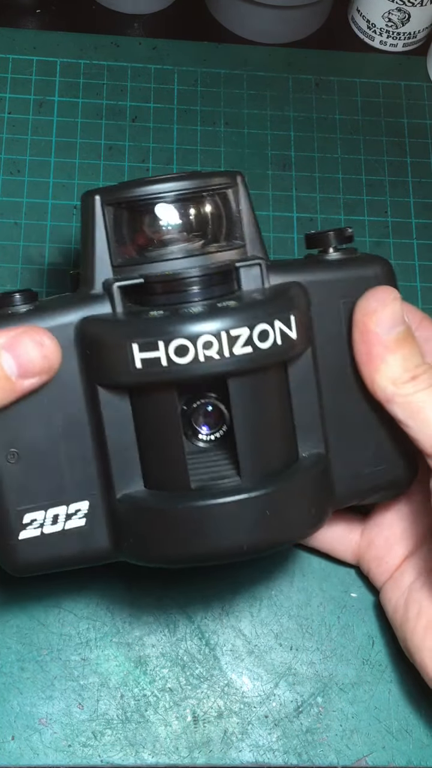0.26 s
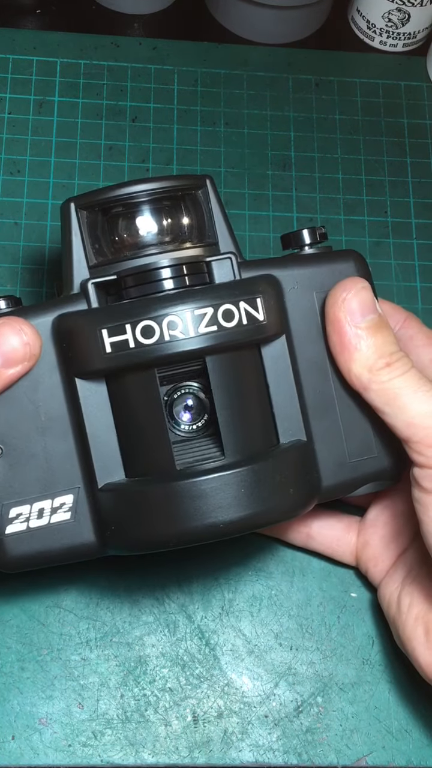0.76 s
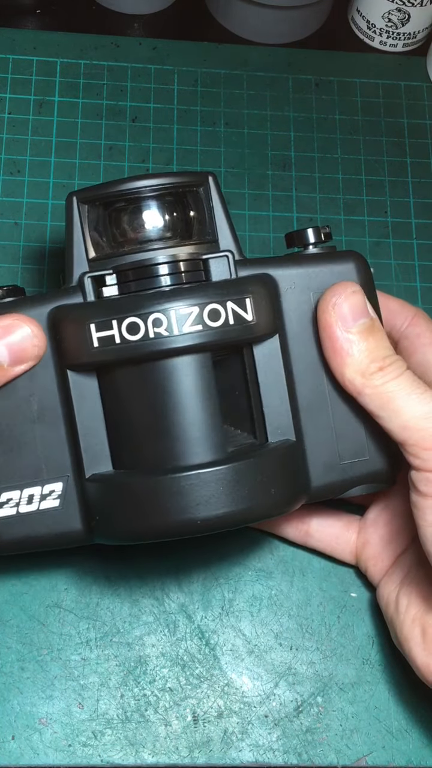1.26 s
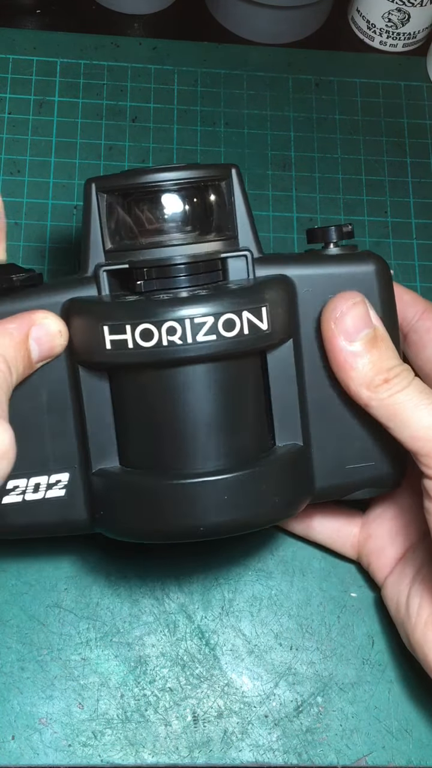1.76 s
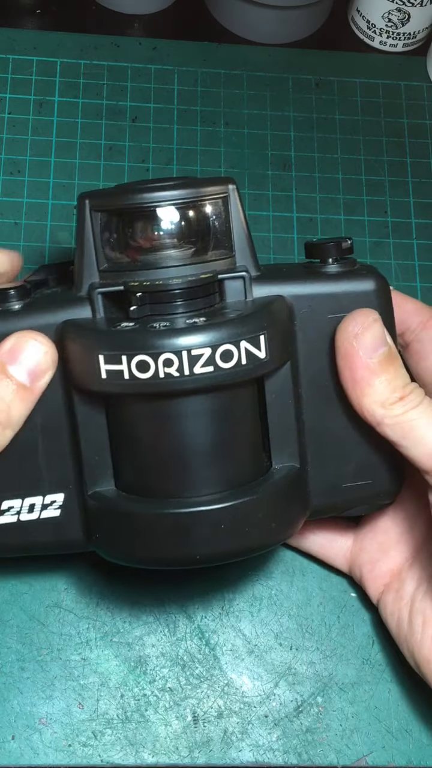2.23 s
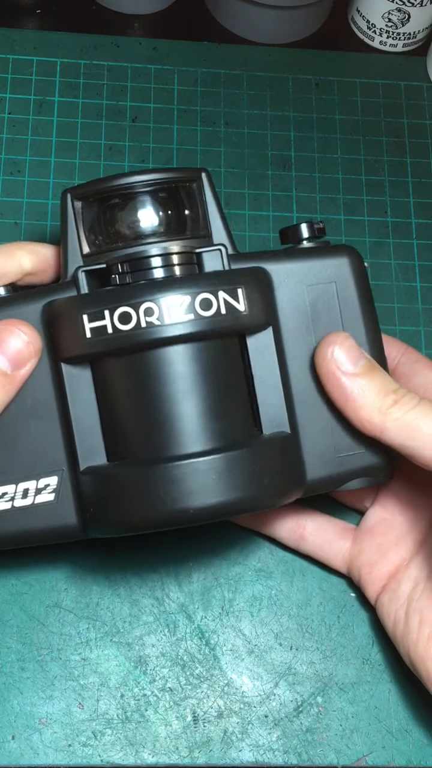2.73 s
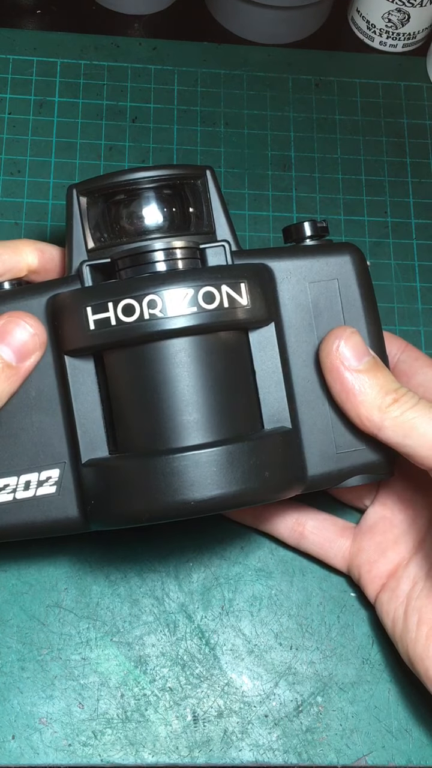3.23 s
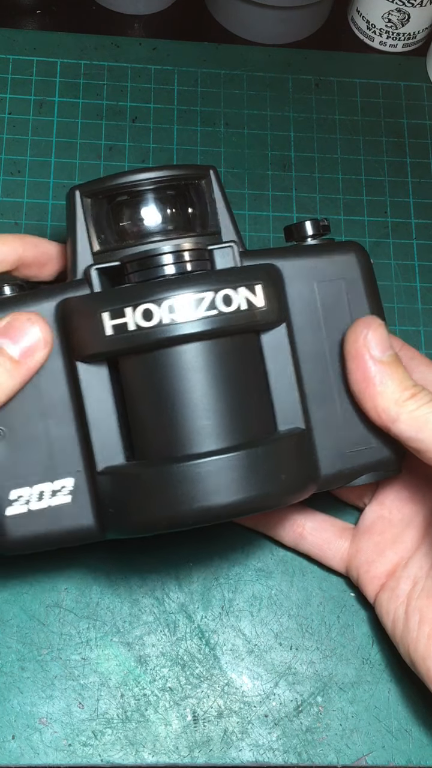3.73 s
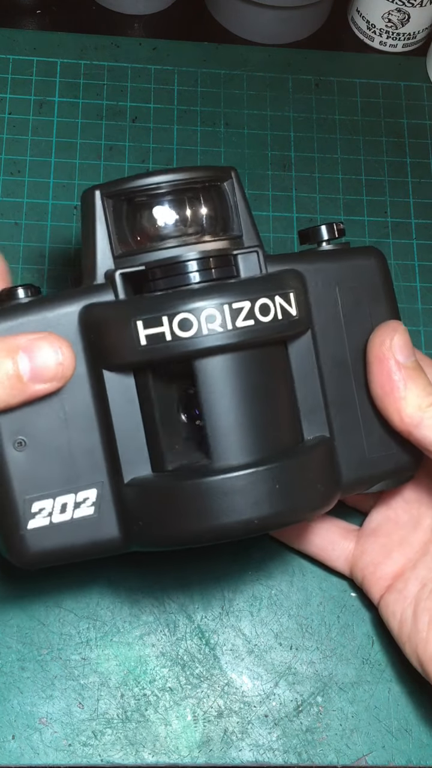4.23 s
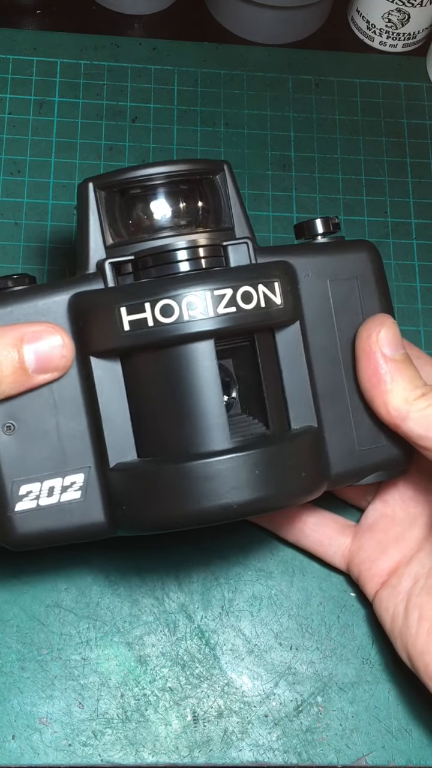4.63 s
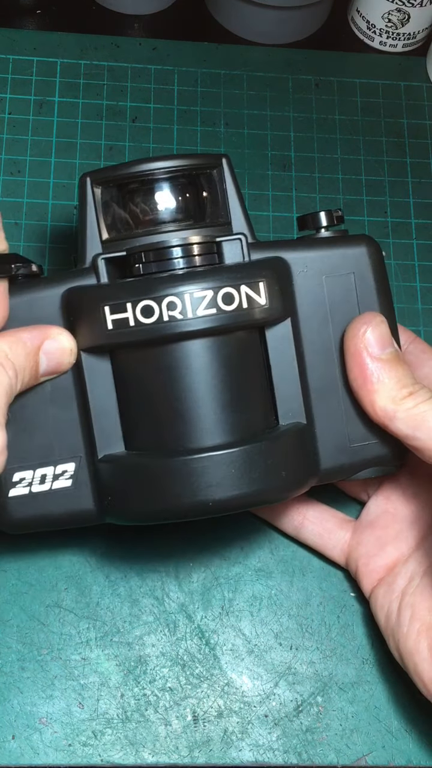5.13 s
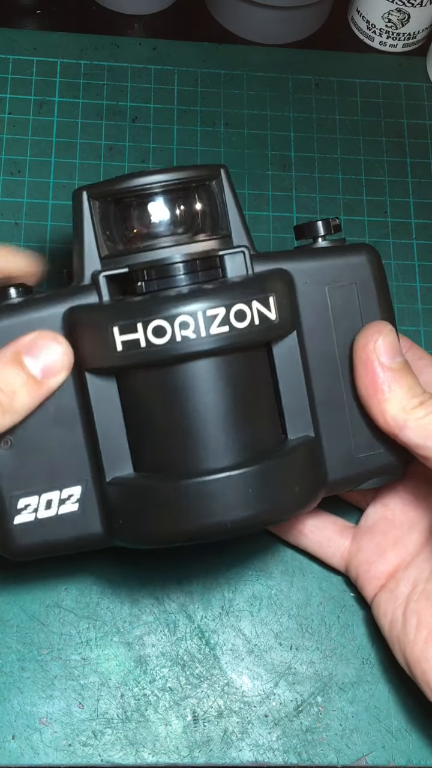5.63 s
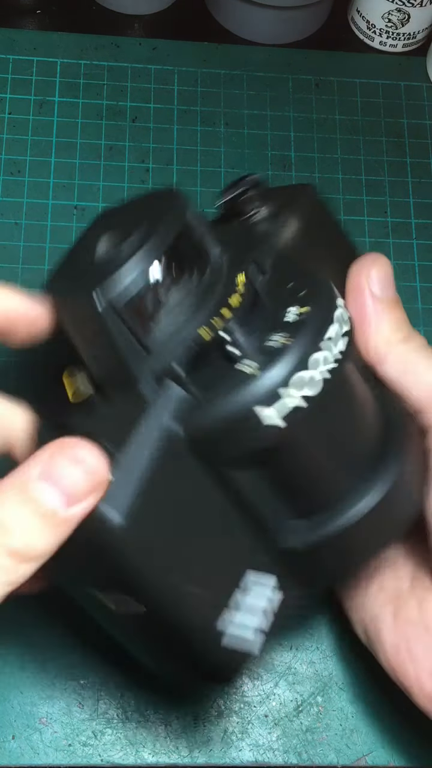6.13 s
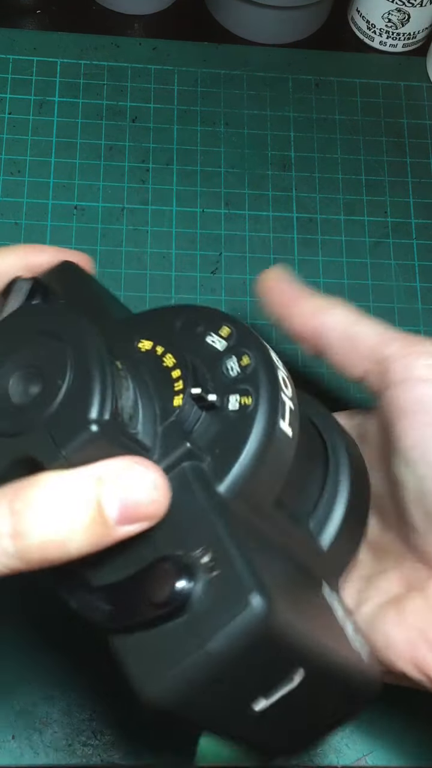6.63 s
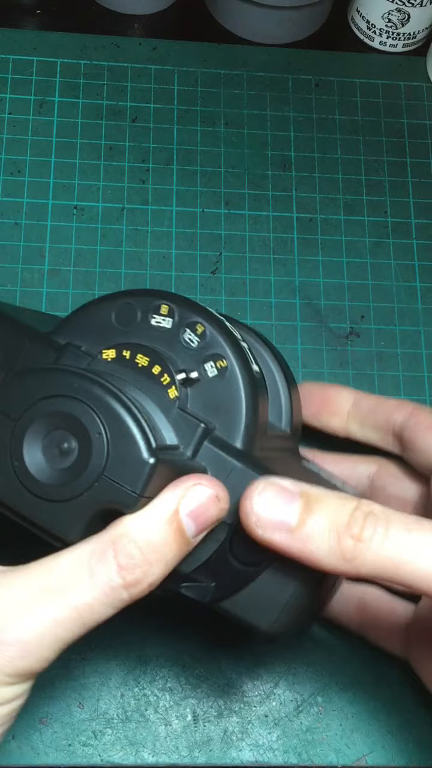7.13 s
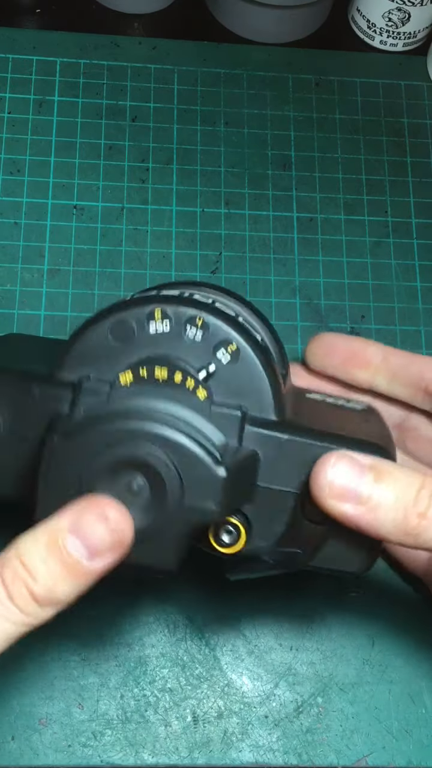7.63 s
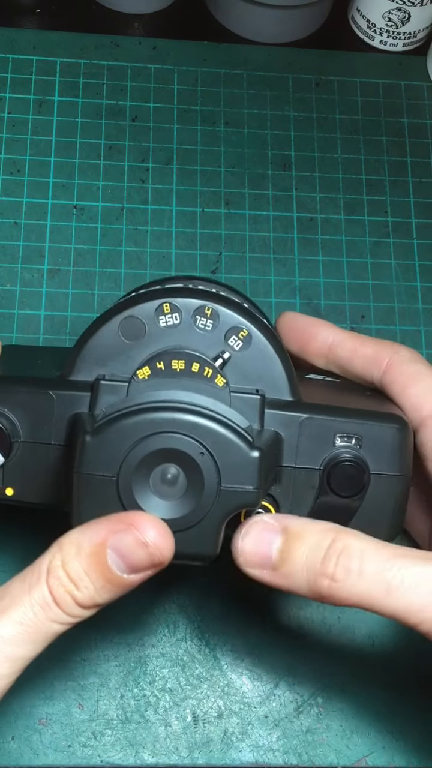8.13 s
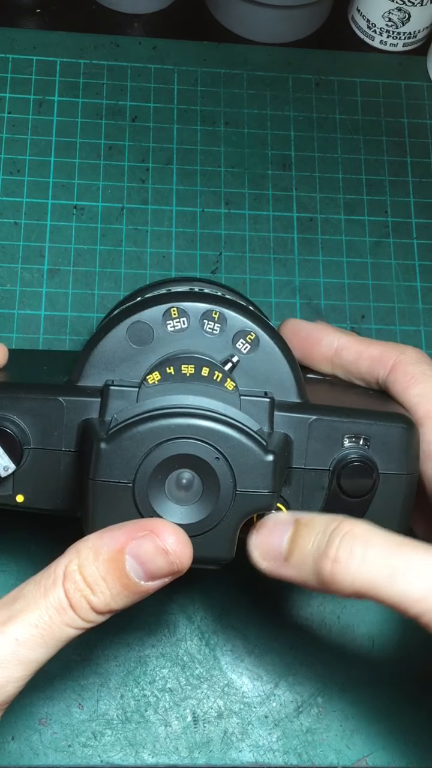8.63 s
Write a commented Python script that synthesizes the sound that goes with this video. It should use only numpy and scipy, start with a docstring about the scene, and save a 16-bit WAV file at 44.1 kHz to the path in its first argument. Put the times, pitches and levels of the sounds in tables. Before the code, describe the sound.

Close mechanical clicks and gear grinding end in sharp snaps, with a fast rasping whirr between them, then handling bumps and a final lever click.

```python
"""In a small room, a swing-lens panoramic camera is worked by hand over a bench, in faint hiss and a deep hum.
Twice the lever winds the lens drum round with ticking gears, runs back and the mechanism snaps home;
in between the shutter fires and the drum whirrs across. Then the plastic body is turned over, bumps the
bench and a setting lever clicks. Bursts of noise ring the camera shell, gears scrape it tooth by tooth,
bumps sound the bench top, and the room adds a short echo."""
import sys
import numpy as np
from scipy import signal
from scipy.fft import rfft, irfft, next_fast_len
from scipy.io import wavfile
from scipy.ndimage import uniform_filter1d

SR = 44100
rng = np.random.default_rng(int(sys.argv[2]) if len(sys.argv) > 2 else 0)


def waveform_to_disk(signal):
    """Save audio, clipped to [-1, 1], as 16-bit WAV at the path in sys.argv[1]."""
    frames = np.transpose(np.atleast_2d(signal))
    scaled = np.clip(frames, -1, 1) * 32767
    samples = np.round(scaled).astype(np.int16)
    wavfile.write(sys.argv[1], SR, samples)


N = 391166
TIME = np.arange(N) / SR

# Levels in the tables are relative: the mix adds its own trims.
# strokes of the winding lever, grinding the gears: (start [s], held for [s], level [dB])
WINDING_STROKES = [(.9, 0.546, -61), (4.06, 0.843, -57)]


def from_db(db):
    """Turn decibels into a gain."""
    return 10 ** (np.asarray(db) / 20)


def rms_one(x):
    """Scale a sound to an average power of one."""
    return x / np.sqrt(np.mean(x ** 2) + 1e-20)


def level(rows):
    """Gain over time from rows (time, .., dB), practically silent outside them."""
    rows = np.array(rows)
    return from_db(np.interp(TIME, rows[:, 0], rows[:, -1], left=-140, right=-140))


def swells(rows, attack_s, release_s):
    """Gain of movements: each comes up 20 dB in attack_s, holds, and loses 20 dB every release_s."""
    gain = 0
    for start_s, held_s, db in rows:
        before = np.maximum(start_s - TIME, 0)
        after = np.maximum(TIME - start_s - held_s, 0)
        gain = gain + from_db(db - 20 * (before / attack_s + after / release_s))
    return gain


def at_hz(points, hz):
    """Read a table of (Hz, value) between its points, evenly by musical pitch."""
    points = np.array(points)
    return np.interp(np.log(np.maximum(hz, 1)), np.log(points[:, 0]), points[:, 1])


def colour(x, spectrum):
    """Give a running sound a smooth balance of bass and treble."""
    size = next_fast_len(N)
    gains = from_db(at_hz(spectrum, np.fft.rfftfreq(size, 1 / SR)))
    return irfft(rfft(x, size) * gains, size)[:N]


def band(x, low_hz, high_hz, order=3):
    """Keep only the pitches between two limits."""
    return signal.sosfilt(signal.butter(order, [low_hz, high_hz], "band", fs=SR, output="sos"), x)


def dying(t, t60):
    """Fading gain that falls 60 dB in t60 seconds."""
    return from_db(-60 * t / t60)


def drift(per_s):
    """Random wandering around zero, with per_s new values a second joined by straight lines."""
    knots = rng.standard_normal(N // 10)
    return np.interp(TIME * per_s, np.arange(len(knots)), knots)


def add(out, s, sound):
    """Mix a short sound in at time s."""
    start = int(s * SR)
    out[start:start + len(sound)] += sound[:max(N - start, 0)]


def ring(force, hz, db, t60):
    """One resonance: a unit click sets a fading sine of the given level ringing."""
    r, w = dying(1 / SR, t60), 2 * np.pi * hz / SR
    # the tiny offset keeps the filter from slowing down in silence
    return from_db(db) * signal.lfilter([0, np.sin(w)], [1, -2 * r * np.cos(w), r * r], force + 1e-18)


def air():
    """The still air of the room: steady noise with a fixed balance of bass and treble."""
    # balance of the hiss: (frequency [Hz], relative level [dB])
    air_spectrum = [(18, -34.5), (30, -7.5), (64, 1.5), (149, -18), (233, -17), (394, -26.5), (666, -26),
                    (937, -30.5), (1390, -28.5), (2900, -35.5), (4910, -47.5), (6550, -43), (7670, -50),
                    (11400, -42.5), (16000, -56)]
    return from_db(-56 + 0.57) * rms_one(colour(rng.standard_normal(N), air_spectrum))


def hum():
    """A deep tone that glides in pitch, and its octave, which swells once."""
    # wandering hum: (time [s], pitch [Hz], level [dB])
    hum_path = [(0, 56, -43.5), (.22, 56.6, -36.5), (.66, 51.2, -48), (.8, 45.25, -55.5),
                (1.051, 36.6, -47.5), (1.5, 31.1, -59.5), (2.3, 36.6, -61), (2.75, 38.55, -49.5),
                (3.55, 46.93, -56), (4.02, 51.6, -39.5), (4.701, 43.1, -56), (4.95, 36.04, -48.5),
                (5.45, 31.4, -73), (6.699, 37, -58), (7.12, 38, -44.5), (7.55, 38.94, -44),
                (8.0, 41.87, -63), (8.87, 39.6, -60.5)]
    # swell of the octave: (start [s], held for [s], level [dB])
    octave_swell = [(2.42, .42, -47)]
    s, hz, db = np.transpose(hum_path)
    phase = 2 * np.pi * np.cumsum(np.interp(TIME, s, hz)) / SR
    deep = level(hum_path) * np.sin(phase)
    octave = swells(octave_swell, attack_s=.3, release_s=.25) * np.sin(2 * phase)
    return np.sqrt(2) * (deep + octave)


def faint_ticking(per_s, wobble, uneven_db, db, low_hz, high_hz):
    """Tiny high ticks in the background hiss, loosely timed and of very uneven strength."""
    count = np.floor(np.cumsum(per_s * np.exp(wobble * drift(40))) / SR)
    beats = np.diff(count, prepend=0)
    ticks = beats * from_db(uneven_db * np.clip(rng.standard_normal(N), -2, 1)) + 1e-18
    return from_db(db) * rms_one(band(ticks, low_hz, high_hz, order=2))


def room(x, near_db, near_t60, far_db):
    """Bench and hands scatter the sound almost at once; the walls answer with a faint, fading tail."""
    # how long the wall echo lasts: (frequency [Hz], time to fall 60 dB [s])
    echo_times = [(200, 0.53), (800, 0.5), (2000, 0.27), (5000, 0.3), (14000, 0.25)]
    t, edges = TIME[:SR // 2], np.geomspace(100, 18000, 9)
    near = rms_one(rng.standard_normal(len(t)) * dying(t, near_t60) * (t > .002))
    noise = rng.standard_normal(len(t))
    far = 0
    for low_hz, high_hz in zip(edges, edges[1:]):
        t60 = at_hz(echo_times, np.sqrt(low_hz * high_hz))
        far = far + band(noise, low_hz, high_hz, order=2) * dying(t, t60)
    response = from_db(near_db) * near + from_db(far_db) * rms_one(far * (t > .008))
    return signal.fftconvolve(x, response / np.sqrt(len(t)))[:N]


def shell(force):
    """The camera's shell and works: all their resonances are driven side by side by one force."""
    # resonances: (frequency [Hz], width [Hz], level [dB])
    shell_modes = [(678.7, 35, -8), (823, 110, 3), (1474, 110, 6), (1906, 320, 9), (2840, 577, 1),
                   (3122, 480, 0), (3610, 400, 3), (5385, 2700, -4), (6754, 140, -13), (7990, 1000, -2.5),
                   (9060, 590, -0.5), (11300, 690, -4.5), (14070, 700, -15), (15500, 530, -18.5)]
    out = 0
    for hz, width_hz, db in shell_modes:
        r = np.exp(-np.pi * width_hz / SR)
        feedback = [1, -2 * r * np.cos(2 * np.pi * hz / SR), r * r]
        out = out + from_db(db) * (1 - r * r) / 2 * signal.lfilter([1, 0, -1], feedback, force)
    return out


def contacts(rows, rise_s, crack_t60, rattle_db, rattle_t60, hardness_hz, low_db, mid_db, high_db):
    """Each contact bites, cracks and leaves loose parts rattling; rows (s, middle, low, treble dB) weigh it."""
    t, out = TIME[:SR // 10], np.zeros(N)
    fading = dying(t, crack_t60) + from_db(rattle_db) * dying(t, rattle_t60)
    force = rng.standard_normal((len(rows), len(t))) * (1 - np.exp(-t / rise_s)) * fading
    # a softer contact carries less treble
    softened = signal.sosfilt(signal.butter(1, hardness_hz, fs=SR, output="sos"), force)
    rings = shell(softened)
    starts, mids, lows, highs = np.transpose(rows)
    registers = [(540, 1100, lows + low_db), (1100, 5000, mids + mid_db), (5000, 17000, highs + high_db)]
    sounds = 0
    for low_hz, high_hz, db in registers:
        part = band(rings, low_hz, high_hz)
        # the loudest 5 ms set the level
        strongest = np.sqrt(uniform_filter1d(part ** 2, size=220, axis=1).max(axis=1))
        sounds = sounds + part * (from_db(db) / strongest)[:, None]
    for s, sound in zip(starts, sounds):
        add(out, s, sound)
    return out


def gear_train(teeth_hz, wobble, tooth_t60, uneven_db, friction_db, spectrum):
    """Teeth meet at a wavering rate, each with a scrape of its own strength, over steady friction."""
    turns = np.cumsum(teeth_hz * np.exp(wobble * drift(60))) / SR
    tooth = turns.astype(int)
    strength = from_db(uneven_db * np.clip(rng.standard_normal(N // 10), -2, 2))[tooth]
    scrape = strength * dying((turns - tooth) / teeth_hz, tooth_t60) + from_db(friction_db)
    return rms_one(shell(colour(rng.standard_normal(N), spectrum) * scrape))


def shifts():
    """The body shifting in the palm: a dull rustle of noise that wavers in strength."""
    # moments of shifting: (start [s], held for [s], level [dB])
    shift_moves = [(6.01, 0.14, -64.5), (6.5, 0.16, -63.5), (7.03, 0.14, -64.5), (7.35, 0.054, -57),
                   (7.94, .03, -58), (8.26, 0.035, -53)]
    # balance of the rustle: (frequency [Hz], level [dB])
    rustle = [(60, -21), (200, 7.5), (400, 3.5), (800, -6.5), (1500, -11), (3000, -30), (8000, -34)]
    noise = rms_one(colour(rng.standard_normal(N), rustle))
    return noise * from_db(2.9 * drift(29)) * swells(shift_moves, attack_s=0.057, release_s=0.051)


def rubs():
    """Skin sliding over the shell: wavering noise that excites its resonances."""
    # moments of rubbing: (start [s], held for [s], level [dB])
    rub_moves = [(2.49, 0.029, -64), (5.8, 0.36, -69), (6.22, 0.36, -71.5), (6.62, 0.074, -59)]
    # balance of the rubbing force: (frequency [Hz], level [dB])
    rub_force = [(300, 19), (750, 9.5), (1600, 7), (3500, 1), (8000, 1), (15500, -2)]
    noise = rms_one(shell(colour(rng.standard_normal(N), rub_force)))
    return noise * from_db(2 * drift(50)) * swells(rub_moves, attack_s=0.091, release_s=.15)


def taps():
    """Fingers tap the plastic and nudge the setting levers; the top cover pings under each contact."""
    # taps: (time [s], middle level [dB], low level [dB], treble level [dB])
    finger_taps = [(0.2718, -47, -69, -68), (2.6323, -46, -71, -63.5), (3.6443, -43, -51.5, -52),
                   (6.0456, -40.5, -42, -66), (6.0948, -45.5, -53.5, -49.5), (6.121, -38.5, -48.5, -46.5),
                   (6.1958, -52, -51.5, -69), (6.5331, -49, -43, -62), (6.756, -38, -42.5, -59),
                   (7.1637, -30, -48.5, -45), (7.2866, -42.5, -71, -54), (7.5661, -38, -54.5, -45),
                   (7.8683, -40.5, -56.5, -60.5), (8.2337, -23.5, -40.5, -48)]
    # ping of the top cover: (frequency [Hz], level [dB], time to fall 60 dB [s])
    top_cover = (1680, -26, .009)
    touches = contacts(finger_taps, rise_s=0.0018, crack_t60=0.012, rattle_db=-26.5, rattle_t60=0.071,
                       hardness_hz=1400, low_db=-5.5, mid_db=-8.5, high_db=-3.5)
    return touches + ring(touches, *top_cover)


def bumps(bench_db, give_s, thud_db, thud_t60):
    """A padded blow swells into the bench resonances; the hollow body adds a short dull thud."""
    # soft bumps of hands and body: (time [s], bench level [dB], hollow thud level [dB])
    soft_bumps = [(1.213, -37, -41.5), (1.896, -36.5, -52), (2.164, -35, -34.5), (2.332, -35, -44),
                  (2.776, -29.5, -38.5), (3.065, -29.5, -38.5), (5.797, -44, -50.5), (5.993, -34.5, -36.5),
                  (6.506, -43, -43.5), (6.76, -21.5, -28), (6.998, -30, -38), (7.56, -40.5, -62),
                  (8.242, -18.5, -30), (8.851, -30, -44)]
    # resonances of the bench top: (frequency [Hz], level [dB], time to fall 60 dB [s])
    bench_modes = [(66.63, 2.5, 0.15), (111.24, -2, 0.21), (156, -15.5, .08), (199, -11, 0.14),
                   (283.5, -17.5, 0.14), (384, -26, 0.092)]
    t, out = TIME[:SR // 2], np.zeros(N)
    swell = 1 - np.exp(-t / give_s)
    for s, blow_db, hollow_db in soft_bumps:
        # each blow excites the resonances a little differently
        strengths = from_db(rng.normal(0, 1.2, len(bench_modes)))
        bench = 0
        for strength, (hz, db, t60) in zip(strengths, bench_modes):
            bench = bench + strength * from_db(db) * dying(t, t60) * np.sin(2 * np.pi * hz * t)
        thud = rms_one(band(rng.standard_normal(len(t)), 130, 488, order=2)) * dying(t, thud_t60)
        add(out, s, from_db(blow_db + bench_db) * swell * bench + from_db(hollow_db + thud_db) * thud)
    return out


def spinning():
    """Gears spin freely as lever or governor runs on: fast, very uneven teeth."""
    # free spins: (start [s], held for [s], level [dB])
    free_spins = [(1.872, 0.071, -41.5), (3.178, 0.084, -40.5), (3.328, 0.0091, -54.5), (5.2, 0.089, -40)]
    # balance of the tooth force: (frequency [Hz], level [dB])
    spin_force = [(300, -10), (750, -6), (1430, -4.5), (3500, -2.5), (5600, -1), (9000, 2.5), (12000, -3.5),
                  (15500, -1.5)]
    gears = gear_train(teeth_hz=294, wobble=0.48, tooth_t60=0.013, uneven_db=8.5, friction_db=-4,
                       spectrum=spin_force)
    return from_db(-1.5) * gears * swells(free_spins, attack_s=.012, release_s=.09)


def grit(per_s, spread_db, grain_t60):
    """Tiny uneven catches between the loaded gear teeth: random short bursts of noise in the shell."""
    strength = from_db(spread_db * np.clip(rng.standard_normal(N), -2, 1.5))
    catches = (rng.random(N) < per_s / SR) * strength
    envelope = signal.lfilter([1], [1, -dying(1 / SR, grain_t60)], catches + 1e-18)
    return rms_one(shell(envelope * rng.standard_normal(N)))


def cranking():
    """The winding strokes: slow gear teeth grind with grit between them, and the thumb's push wavers."""
    # balance of the grinding force: (frequency [Hz], level [dB])
    grind_force = [(300, -3), (780, 18.5), (1430, -1.5), (3500, -4), (5600, 7.5), (9000, -9), (15500, 2)]
    grind = gear_train(teeth_hz=88, wobble=.16, tooth_t60=.02, uneven_db=2.5, friction_db=-7,
                       spectrum=grind_force)
    winding = from_db(-0.5) * grind + from_db(-5.5) * grit(per_s=85, spread_db=8.0, grain_t60=0.0069)
    push = from_db(3 * drift(28))
    return winding * push * swells(WINDING_STROKES, attack_s=.05, release_s=0.078)


def pawl_run(count):
    """In the first stroke the pawl steps over teeth, slower and harder as the spring tightens: (s, dB)."""
    start_s, first_step_s, slowing = 1.1028, .0406, .036
    first_db, rise_db = -36.5, 1.5
    step = np.arange(count)
    gaps = first_step_s * (1 + slowing) ** step
    return list(zip(start_s + np.cumsum(gaps) - gaps, first_db + rise_db * step))


def stray_ticks(count):
    """Small gear ticks come loosely spaced through each stroke and follow its level: rows (s, dB)."""
    per_s, above_grind_db, spread_db = 24, 15, 5
    rows = []
    for start_s, held_s, db in WINDING_STROKES:
        after = (np.arange(count) + rng.random(count)) / per_s
        peaks = db + above_grind_db + spread_db * np.clip(rng.standard_normal(count), -2, 2)
        rows += [(start_s + s, peak) for s, peak in zip(after, peaks) if s < held_s]
    return rows


def ticks():
    """Pawl, catches, release and small gear ticks: short, hard contacts that ring the shell."""
    # clear clicks: (time [s], middle level [dB], treble level [dB])
    clear_clicks = [(0.4966, -43, -52), (0.7225, -33.5, -44.5), (0.8649, -42, -64), (0.8966, -38.5, -51),
                    (0.9826, -34.5, -52.5), (1.3543, -31.5, -43), (1.3762, -35.5, -43.5),
                    (1.463, -40.5, -45.5), (1.486, -29.5, -45), (2.754, -16, -31.5), (3.5618, -38.5, -63),
                    (3.5892, -28, -33.5), (3.9245, -33.5, -41), (3.9379, -25.5, -36),
                    (4.0871, -29.5, -45.5), (4.1176, -25, -35), (4.1278, -20.5, -27),
                    (4.1613, -22.5, -27.5), (4.2344, -33.5, -56), (4.334, -36, -54), (4.3725, -37.5, -54),
                    (4.4047, -43, -57), (4.4597, -32.5, -53), (4.5169, -31, -44), (4.5622, -32, -43),
                    (4.586, -30, -48), (4.6265, -27.5, -46), (4.7275, -32, -48.5), (4.7566, -36, -55),
                    (4.922, -38, -43.5), (4.939, -22.5, -35.5), (5.58, -32.5, -44.5), (5.5955, -28.5, -40)]
    # low and usual treble level against the middle, in dB
    low_change_db, treble_change_db = -23, -15
    small = [(s, db, db + treble_change_db) for s, db in pawl_run(count=6) + stray_ticks(count=40)]
    rows = [(s, db, db + low_change_db, treble_db) for s, db, treble_db in clear_clicks + small]
    return contacts(rows, rise_s=.0008, crack_t60=.012, rattle_db=-19.5, rattle_t60=0.049,
                    hardness_hz=14725, low_db=-2.0, mid_db=-10.5, high_db=-2.5)


def snap_contacts():
    """A sprung lever snaps against its stop: a faint lead-in, the hit and two rebounds."""
    # snaps: (time [s], middle [dB], low [dB], treble [dB], first rebound after [s], rebound change [dB])
    lever_snaps = [(2.168, -6.5, -37.5, -15, .012, -7), (5.6047, -6.5, -24.5, -16.5, 0.0081, -9),
                   (8.850, -14.5, -33, -26, .0115, -4.5)]
    lead_in_s, lead_in_db = .004, -19
    # the second rebound comes sooner; rebounds are duller than the hit
    rebound_shrink, rebound_low_db = .52, 4
    rows = []
    for s, db, low_db, treble_db, gap_s, rebound_db in lever_snaps:
        touches = [(-lead_in_s, lead_in_db, 0), (0, 0, 0), (gap_s, rebound_db, rebound_low_db),
                   (gap_s * (1 + rebound_shrink), rebound_db, rebound_low_db)]
        for after, change, dull in touches:
            rows.append((s + after, db + change, low_db + change + dull, treble_db + change))
    return rows


def snaps():
    """The snaps ring the shell as hard, bright contacts."""
    return contacts(snap_contacts(), rise_s=0.0022, crack_t60=0.012, rattle_db=-21.5, rattle_t60=.07,
                    hardness_hz=16200, low_db=-3, mid_db=-9.0, high_db=-1)


def panels():
    """The low push of each snap feeds the back panel, which rings on at its own slightly unsteady pitch."""
    # ringing of the back panel: (frequency [Hz], level [dB], time to fall 60 dB [s])
    back_panel = (730, -9, .2)
    hz, db, t60 = back_panel
    pushes = np.zeros(N)
    for s, mid_db, low_db, treble_db in snap_contacts():
        add(pushes, s, from_db([low_db + db]))
    swing = signal.lfilter([1], [1, -dying(1 / SR, t60)], pushes + 1e-18)
    return swing * np.sin(2 * np.pi * hz * TIME + .3 * drift(80))


def end_stop(count):
    """The drum shudders into its cushioned end stop: evenly spaced knocks that lose their low push first."""
    start_s, gap_s = 3.060, .0132
    mid_db, low_db, treble_db = -21.5, -28.5, -36.5   # first knock
    loss_db, low_loss_db = 2.5, 11   # from knock to knock
    rows = [(start_s + k * gap_s, mid_db - k * loss_db, low_db - k * low_loss_db, treble_db)
            for k in range(count)]
    return contacts(rows, rise_s=0.004, crack_t60=0.03, rattle_db=-29, rattle_t60=0.059,
                    hardness_hz=2100, low_db=-3.0, mid_db=-7.5, high_db=-1)


def whine():
    """Rough whine of the fast gears: a narrow band of noise, rising as the drum speeds up, falling as it brakes."""
    # pitch and strength of the whine: (time [s], pitch [Hz], level [dB])
    whine_path = [(2.766, 1395, -36.5), (2.785, 2400, -26), (2.815, 3410, -31), (3.055, 3214, -27.5),
                  (3.07, 2250, -25), (3.10, 1658, -34.5), (3.12, 1351, -38), (3.14, 1256, -59)]
    s, hz, db = np.transpose(whine_path)
    phase = 2 * np.pi * np.cumsum(np.interp(TIME, s, hz)) / SR
    # faster wandering makes the band of noise wider
    rough = drift(850) * np.sin(phase) + drift(850) * np.cos(phase)
    return level(whine_path) * rms_one(rough)


def shutter(beat_hz, wobble, swing_db):
    """Tooth after tooth drags over the escapement anchor and rings it, while the fast driving gears rasp."""
    # lens drum running against its escapement: (time [s], level [dB])
    drum_swing = [(2.75, -28.5), (2.752, -30.5), (2.804, -16), (2.814, -28), (2.82, -21.5), (2.838, -19),
                  (2.918, -23), (3.066, -23), (3.16, -45.5)]
    # resonances of the escapement anchor: (frequency [Hz], level [dB], time to fall 60 dB [s])
    anchor_modes = [(2696, -3.5, 0.025), (3080, -3.5, 0.021), (3196, 5, 0.013), (3370, -2, 0.04),
                    (3680, 0, 0.023), (3836, 2, 0.037)]
    # balance of the gear force: (frequency [Hz], level [dB])
    escapement_force = [(400, -30), (570, -12), (750, -18), (1430, -8), (1950, -9.5), (2800, -7.5),
                        (3400, -10), (4500, -6), (5600, -4), (8000, 0.5), (9400, -2), (10300, -13.5),
                        (12000, -5), (15500, -6.5)]
    turns = np.cumsum(beat_hz * np.exp(wobble * drift(90))) / SR
    strength = from_db(3.5 * np.clip(rng.standard_normal(N // 10), -2, 1))[turns.astype(int)]
    drag = strength * np.sin(np.pi * turns) ** 4   # one smooth pulse for each tooth
    rings = sum(ring(drag * rng.standard_normal(N), *mode) for mode in anchor_modes)
    # keep only the anchor's ringing band, without low rumble
    rings = rms_one(band(rings, 1900, 4020))
    gears = gear_train(teeth_hz=316.7, wobble=0.24, tooth_t60=.014, uneven_db=1.0, friction_db=-13.5,
                       spectrum=escapement_force)
    drive = level(drum_swing)
    bite = np.sqrt(drive / drive.max())   # the anchor rings most where the drive is strongest
    return from_db(swing_db) * drive * (1.25 * bite * rings + .65 * gears)


def whirr():
    """The drum's run across: escapement and gears, wavering in strength, with the whine on top."""
    return shutter(beat_hz=157.7, wobble=.15, swing_db=0.5) * from_db(1.5 * drift(90)) + whine()


def scene():
    """Mix the background, the hands, the camera's works and the room's echo."""
    ticking = faint_ticking(per_s=60, wobble=0.22, uneven_db=7.5, db=-76.5, low_hz=5840, high_hz=7070)
    background = air() + hum() + ticking
    hands = shifts() + rubs() + taps() + bumps(bench_db=4.5, give_s=0.011, thud_db=-0.5, thud_t60=0.085)
    works = spinning() + cranking() + ticks() + snaps() + panels() + end_stop(count=5) + whirr()
    direct = works + hands
    echo = room(direct, near_db=-12, near_t60=0.093, far_db=-17.0)
    return (direct + echo + background)[None]


def record(dry):
    """The microphone loses the deepest bass (below 30 Hz); the top is cut steeply at 16.4 kHz."""
    thinned = signal.sosfilt(signal.butter(6, 30, "high", fs=SR, output="sos"), dry)
    return signal.sosfilt(signal.ellip(10, .2, 70, 16400, fs=SR, output="sos"), thinned)


dry = scene()
out = record(dry)
waveform_to_disk(out)
```